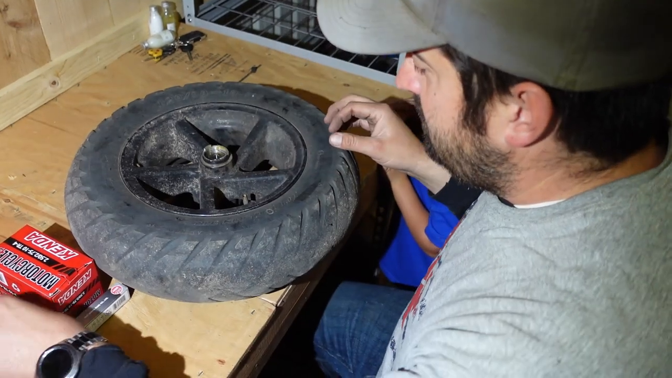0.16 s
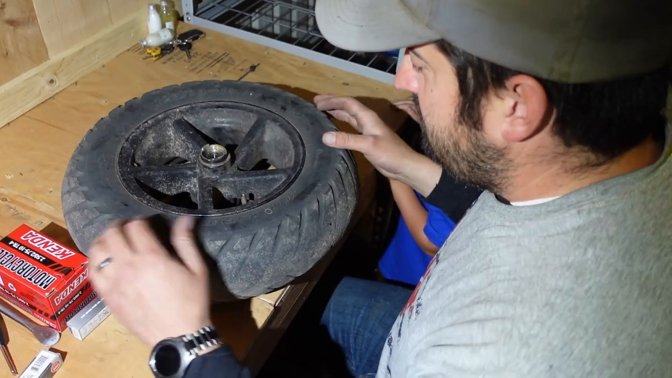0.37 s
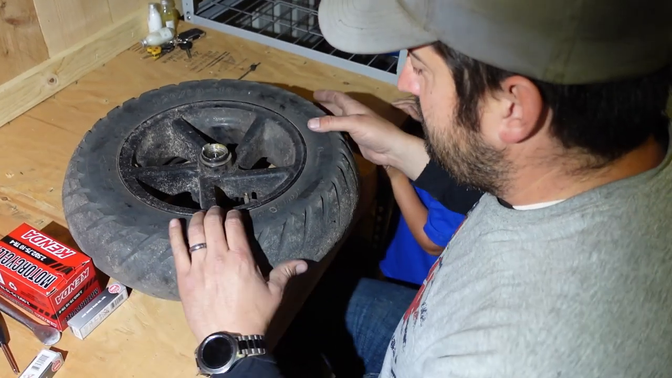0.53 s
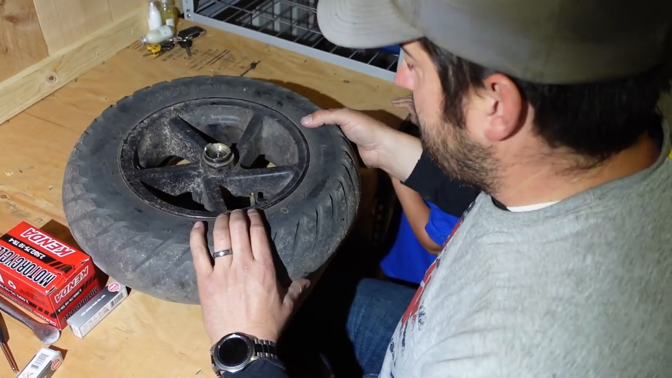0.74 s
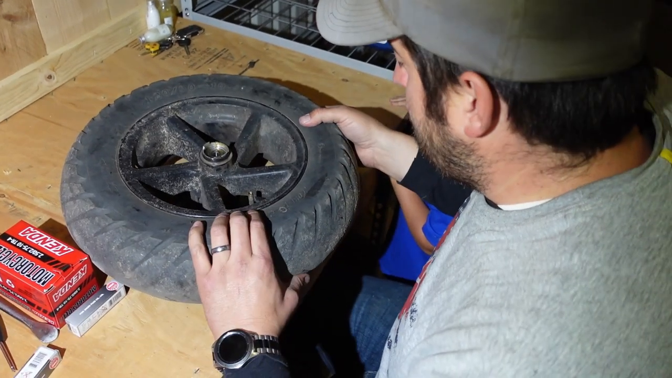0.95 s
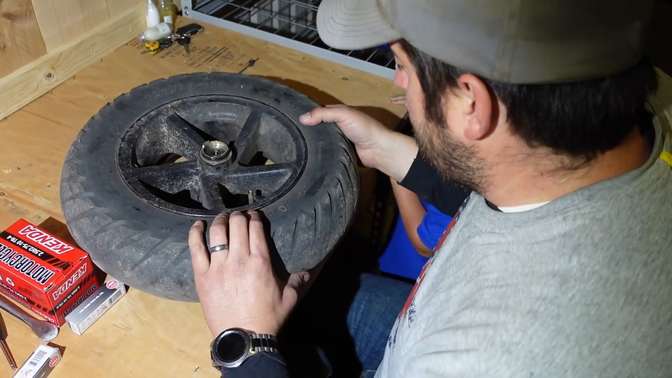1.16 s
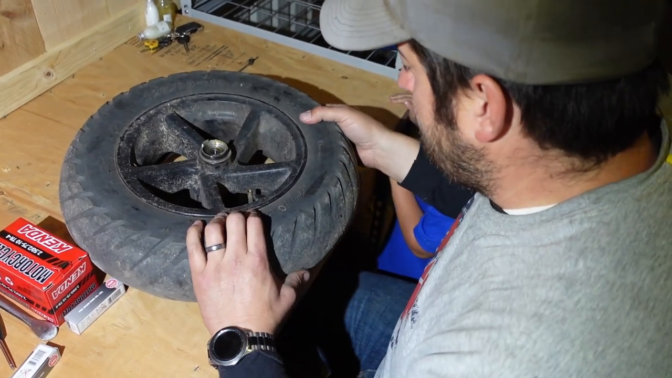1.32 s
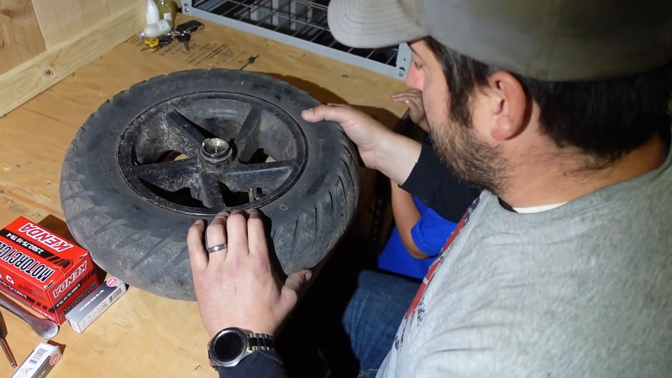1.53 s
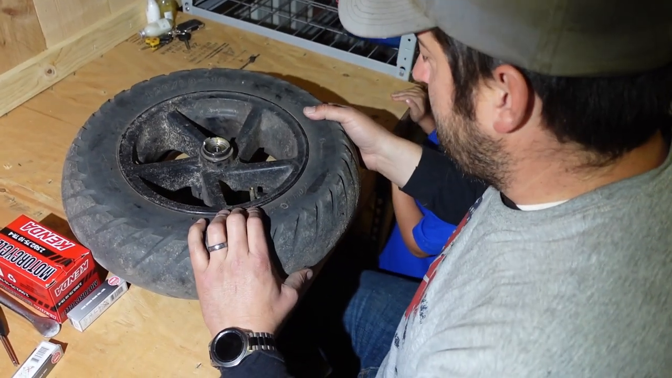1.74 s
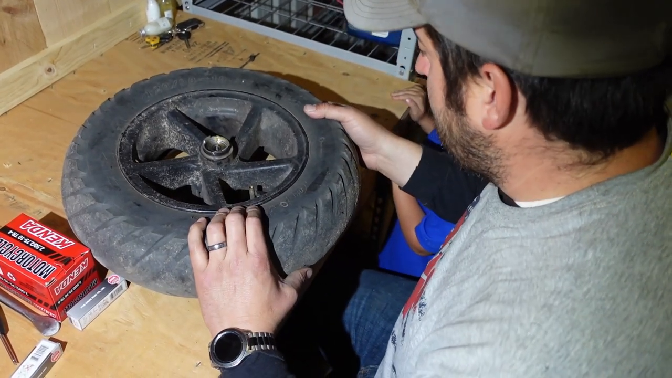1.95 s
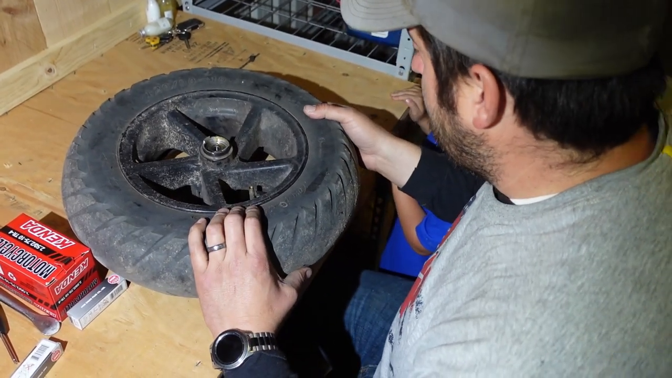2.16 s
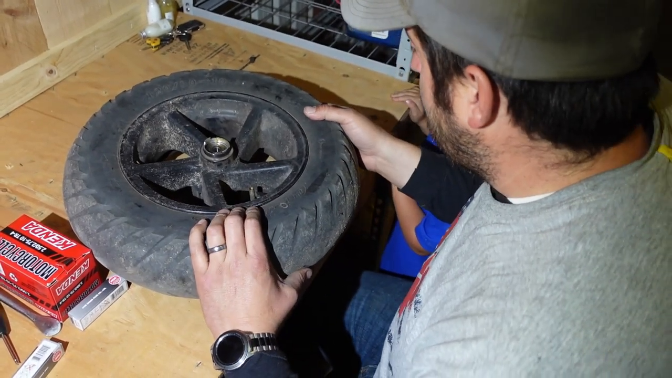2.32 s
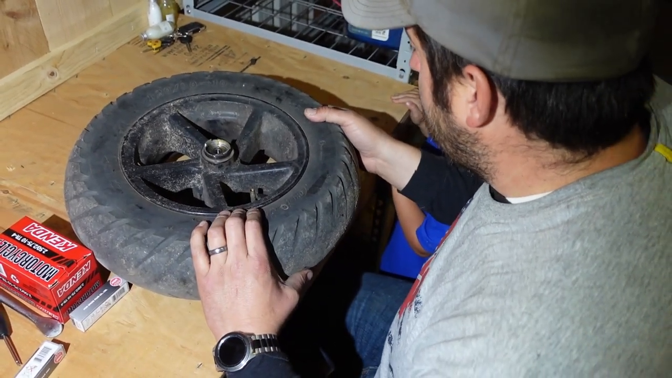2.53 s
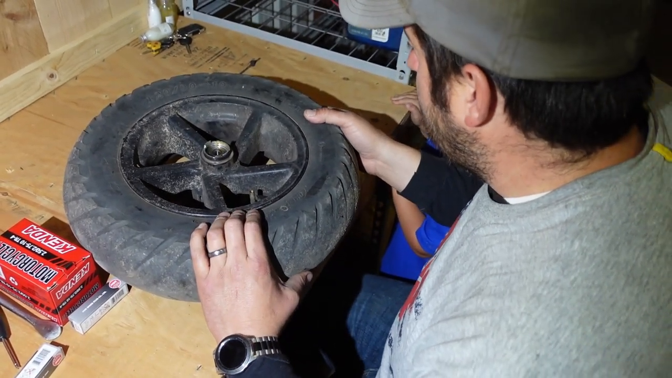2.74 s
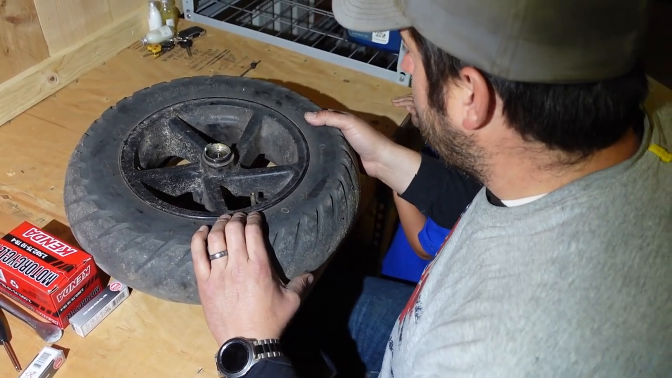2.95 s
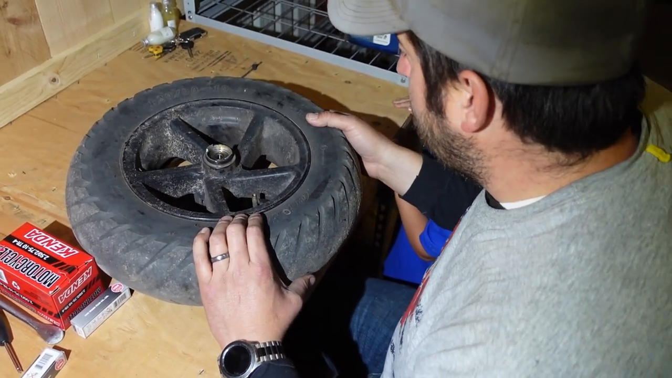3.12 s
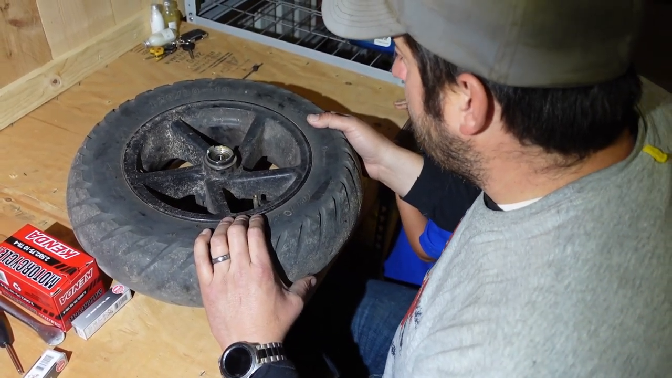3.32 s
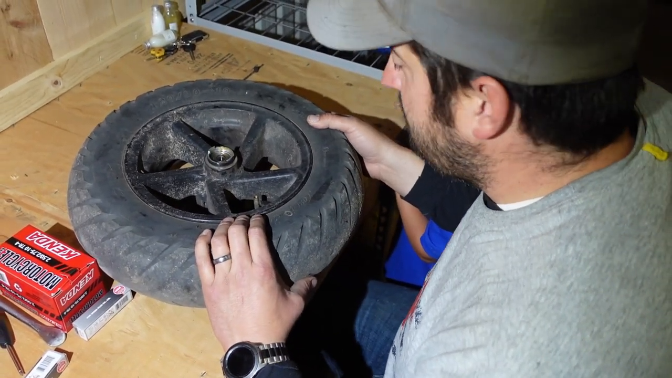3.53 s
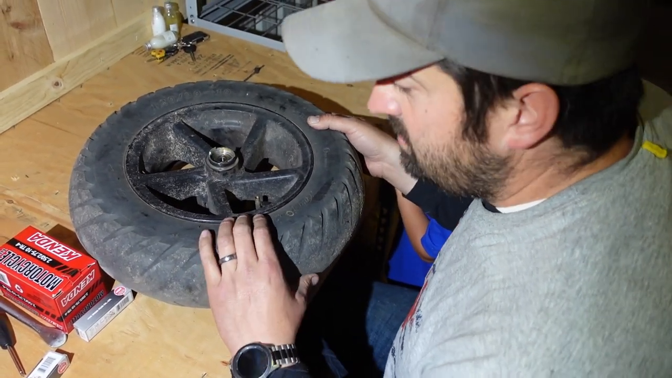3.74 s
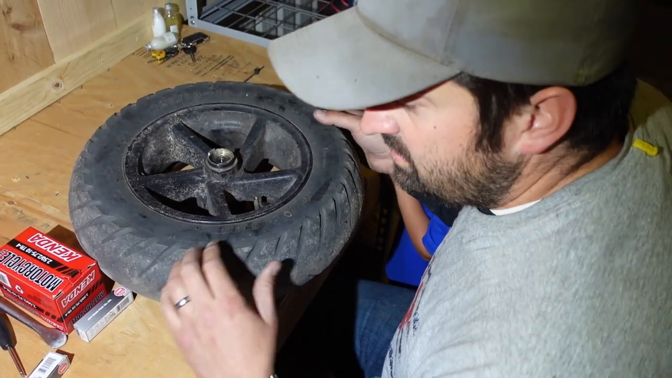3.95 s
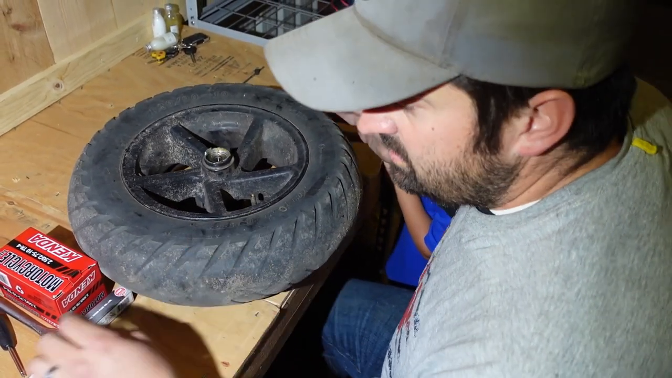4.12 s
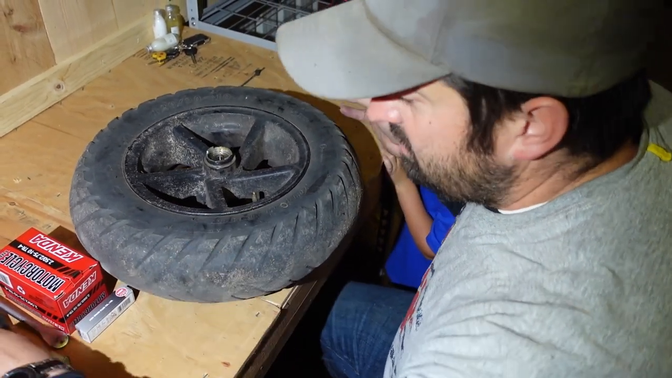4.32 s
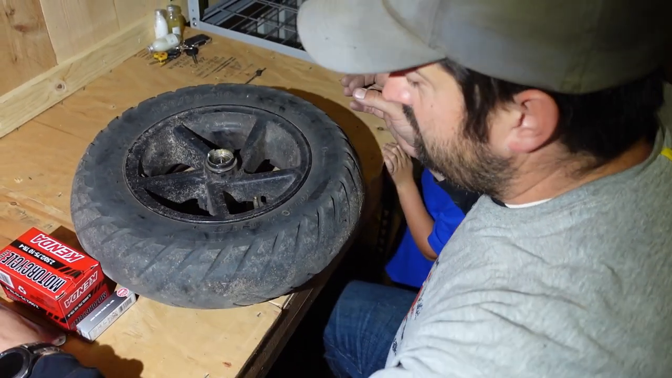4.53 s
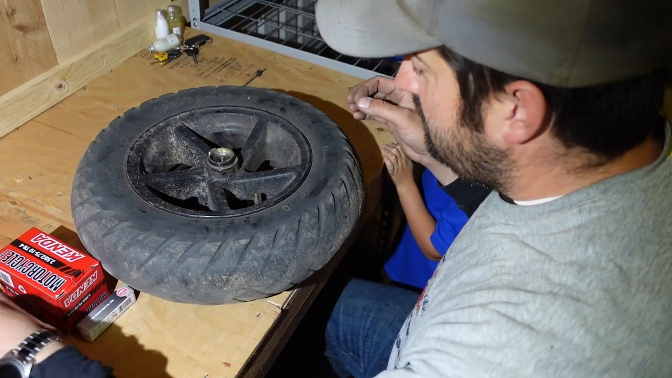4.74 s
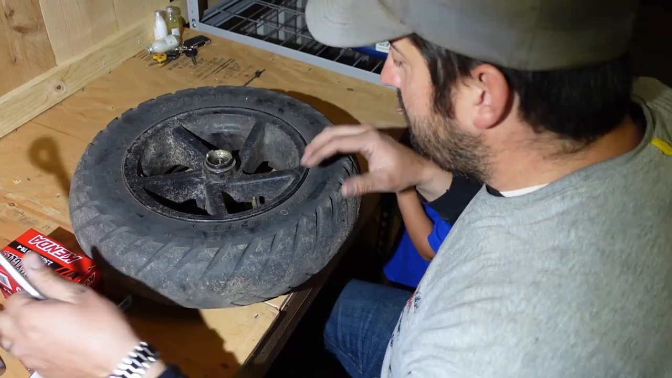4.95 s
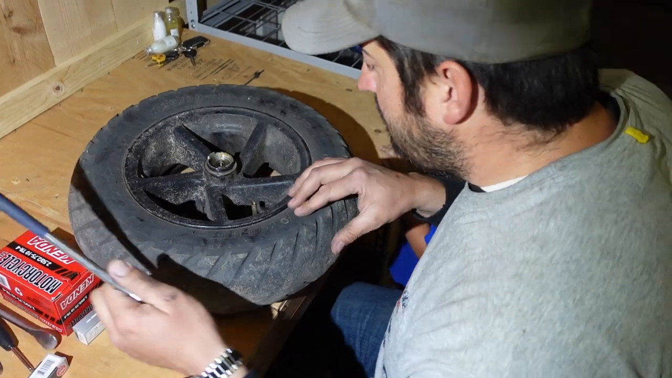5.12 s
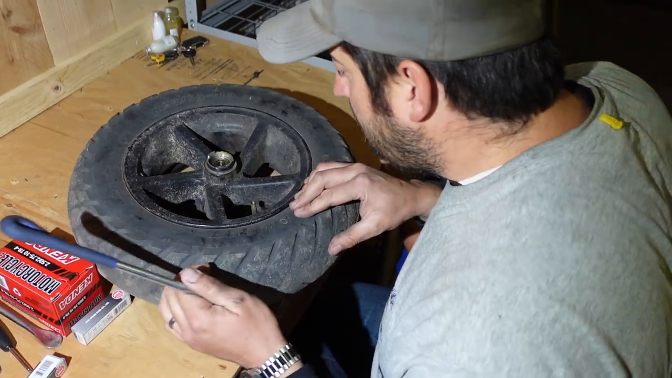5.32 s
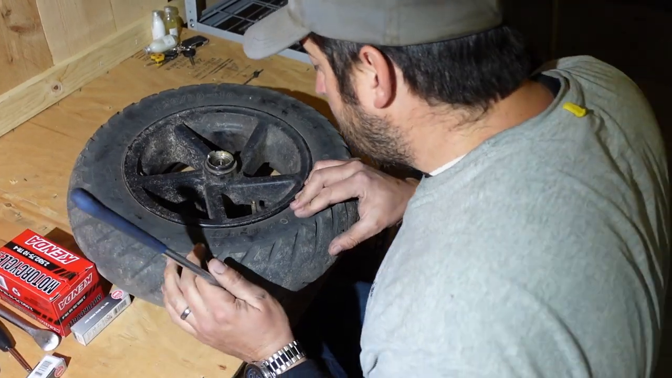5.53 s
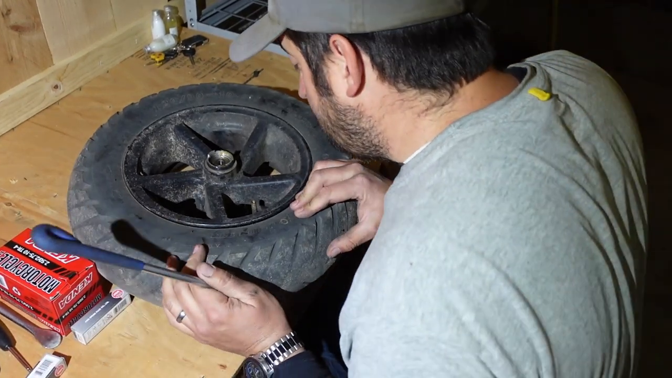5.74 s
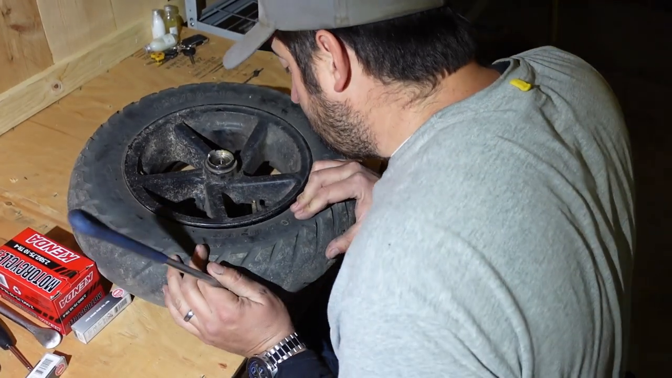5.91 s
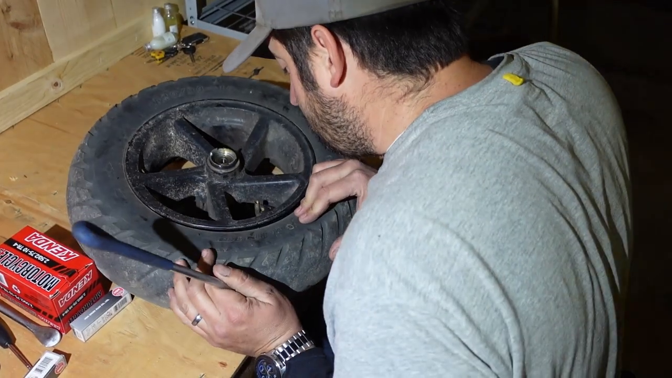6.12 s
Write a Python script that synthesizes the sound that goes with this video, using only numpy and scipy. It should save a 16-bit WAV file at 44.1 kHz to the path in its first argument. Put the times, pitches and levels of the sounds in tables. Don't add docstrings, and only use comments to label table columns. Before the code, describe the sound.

Pressurised air rushes loudly from a small tire's open valve with breathy whistles, fading away before thuds, pats and scrapes on a wooden bench.

```python
import sys
import numpy as np
from scipy import signal
from scipy.fft import rfft, irfft, next_fast_len
from scipy.io import wavfile
from scipy.ndimage import uniform_filter1d

SR = 44100
rng = np.random.default_rng(int(sys.argv[2]) if len(sys.argv) > 2 else 0)


def digitize_waveform(pressure):
    field = np.atleast_2d(pressure).T
    bounded = np.clip(field, -1, 1)
    quanta = np.round(bounded * 32767).astype(np.int16)
    wavfile.write(sys.argv[1], SR, quanta)


def invert_db(x):
    u = np.asarray(x, float) / 20
    return 10 ** u


N = 272229
HZ = np.fft.rfftfreq(1024, 1 / SR)
TIMES = np.arange(N // 128 + 9) * 128 / SR
SNAP_TOP_HZ = 15500


def evened(x):
    return x / np.sqrt(np.mean(x ** 2) + 1e-20)


def read(points, hz):
    f, value = np.transpose(points)
    return np.interp(np.log(hz + 1), np.log(f + 1), value)


def curves(rows, t):
    s, *columns = np.transpose(rows)
    return [np.interp(t, s, c) for c in columns]


def add(mix, s, sound):
    part = mix[round(s * SR):][:len(sound)]
    part += sound[:len(part)]


def bandpass(x, order, band_hz):
    return signal.sosfilt(signal.butter(order, band_hz, "bandpass", fs=SR, output="sos"), x)


def hump(hz, width_hz):
    shape = 1 / (1 + ((HZ - np.reshape(hz, (-1, 1))) / (width_hz * .5)) ** 2) ** 2
    return shape / shape.sum(1, keepdims=True)


def noise(power):
    a, b = rng.standard_normal((len(TIMES), len(HZ), 2)).T
    spectrum = (a + 1j * b) * np.sqrt(power).T
    return 1.41 * signal.istft(spectrum, nperseg=1024, noverlap=896)[1][:N]


def wander(seconds, hz_wide):
    field = rng.standard_normal((len(TIMES), len(HZ)))
    for _ in range(2):
        field = uniform_filter1d(field, max(round(seconds / TIMES[1]), 1), 0)
        field = uniform_filter1d(field, max(round(hz_wide / HZ[1]), 1), 1)
    return evened(field)


def flutter(seconds):
    size = max(round(seconds * SR), 1)
    once = uniform_filter1d(rng.standard_normal(N), size)
    return evened(uniform_filter1d(once, size))


# (frequency [Hz], density [dB per Hz])
BACKGROUND_COLOUR = [(12, -41), (20, -11.5), (260, -24.5), (691, -32), (2560, -31.5), (2860, -23.5), (4000, -41),
                     (4730, -41), (5920, -41), (8400, -37), (8990, -35.5), (9900, -32), (10400, -47), (15700, -42)]
# (time [s], level [dB])
DEEP_RUMBLE = [(0.0, -43), (1.0, -39), (4.1, -32.5), (4.65, -43), (4.95, -58), (5.14, -18), (5.29, -14),
               (5.4, -28), (6.17, -26)]


def shop():
    colour = invert_db(2 * read(BACKGROUND_COLOUR, HZ))
    tone = noise(np.ones((len(TIMES), 1)) * colour / colour.sum()) * invert_db(-52)
    deep = evened(bandpass(rng.standard_normal(N), 2, [14, 55]))
    deep_db, = curves(DEEP_RUMBLE, np.arange(N) / SR)
    return tone + deep * invert_db(deep_db - 13)


# (frequency [Hz], density [dB per Hz])
WOOD_COLOUR = [(35, -53), (60, 6), (316, 2.5), (1050, -11), (1170, -11.5), (1600, -17), (2280, -15.5),
               (3040, -34), (3870, -27), (12000, -52), (15600, -70), (22000, -120)]
# (time [s], level [dB], brightness [dB per octave above 500 Hz])
SLIDES = [
    [(0.0, -71, 2), (0.05, -45, 4.5), (0.136, -45.5, 14), (0.232, -32, -35), (0.45, -47.5, 13)],
    [(4.34, -72, 9), (4.46, -38, 4.5), (4.59, -31, -2.5), (4.74, -28, -3.5), (4.87, -35, -3.5),
     (5.034, -21, -10.5), (5.14, -35, -2.5), (5.27, -32.5, -1.5), (5.548, -43, -3.5), (5.75, -54.5, 3.5),
     (6.17, -56, 7)],
]


def slide(rows):
    db, bright_db = (c[:, None] for c in curves(rows, TIMES))
    moving = ((TIMES > rows[0][0]) & (TIMES < rows[-1][0]))[:, None]
    colour = invert_db(2 * read(WOOD_COLOUR, HZ))
    power = moving * colour / colour.sum() * invert_db(2 * (db + bright_db * np.log2(HZ / 500 + 1)))
    return noise(power) * invert_db(1.6 * flutter(.006))


# (time [s], peak [dB], favoured pitch [Hz], ring factor [1])
THUD_HITS = [(0.847, -47, 110, 1.2), (1.672, -31, 111, 0.39), (4.392, -31.5, 120, 0.16),
             (4.687, -13, 109, 0.13), (4.78, -13, 141.7, 0.17), (5.169, -10.5, 108.5, 0.88),
             (5.199, -13.5, 111, 0.77), (5.3, -24, 110, 0.29), (5.38, -50, 99, .6), (5.408, -32, 110, 0.32),
             (6.152, -28, 95, 1.1)]
# (time [s], peak [dB], favoured pitch [Hz], spread [octaves], ring factor [1])
KNOCK_HITS = [(0.229, -9.5, 870, 0.7, 0.39), (.274, -16, 910, 1.1, 0.45), (0.304, -6.5, 850, 1.16, 0.48),
              (0.314, -18, 770, 0.67, 0.95), (.346, -9.5, 785, 1.23, 0.31), (.74, -26.5, 70, 1.76, 0.1),
              (0.764, -32, 65, 1.3, 0.31), (.788, -30, 111, 1.3, 0.2), (1.674, -28, 390, 0.57, 0.32),
              (1.785, -29.5, 980, 0.31, 0.59), (3.753, -31.5, 850, 0.37, 0.2),
              (4.525, -21, 740, 0.24, 0.56), (4.542, -34, 316, 0.44, .55), (4.624, -19.5, 296, 0.28, 0.64),
              (4.637, -24, 323, 0.28, 0.58), (4.686, -11.5, 298, 0.89, 1.1), (4.705, -24, 200, 1.5, 0.7),
              (4.778, -11.5, 305, 0.63, 0.5), (4.8, -19, 247, 0.98, 0.77), (5.003, -14, 330, 0.45, 0.7),
              (5.026, -50, 1750, 0.11, 3.8), (5.164, -16.5, 232, 0.5, 0.77), (5.165, -28, 1330, 0.12, 0.48),
              (5.249, -12.5, 110, 0.61, 0.46)]
# (time [s], peak [dB], favoured pitch [Hz], spread [octaves], contact [s])
SCRAPE_HITS = [(.029, -28, 436, 0.41, 0.0042), (.064, -15.5, 880, 0.39, 0.0026), (.328, -44, 700, 1, 0.025),
               (.358, -21, 537, 1.3, 0.0081), (.698, -37, 110, 1, 0.014), (4.425, -31.5, 1150, 0.35, 0.051),
               (4.462, -15, 1070, 0.21, 0.011), (4.465, -21, 2100, 0.14, 0.014),
               (4.507, -21, 314, 0.14, 0.014), (4.578, -30.5, 900, 0.72, 0.015),
               (4.731, -21.5, 870, 0.19, 0.016), (4.926, -27.5, 586, 0.72, 0.036),
               (5.005, -16.5, 720, 0.3, 0.0069), (5.05, -25.5, 325, 0.2, 0.012),
               (5.2095, -14, 287.2, 0.58, 0.0053), (5.2476, -28.5, 2200, 0.4, 0.002),
               (5.249, -24.5, 880, 0.17, 0.017), (5.012, -27, 1770, 0.46, 0.0045),
               (5.27, -37, 1300, 0.82, 0.014)]


def blows():
    rows = []
    for s, db, hz, ring in THUD_HITS:
        rows.append((s, db, hz, 0.23, ring, 1 / hz))
    for s, db, hz, spread, ring in KNOCK_HITS:
        contact_cycles = np.clip(1.14 - 0.66 * spread, .2, 1.45)
        rows.append((s, db, hz, spread, ring, contact_cycles / hz))
    for s, db, hz, spread, contact_s in SCRAPE_HITS:
        ring = 0.59 + 0.1 * np.log2(hz / 500)
        rows.append((s, db, hz, spread, ring, contact_s))
    return sorted(rows)


# (frequency [Hz], t60 [s])
BENCH_MODES = [(70, .15), (116, .4), (162, .22), (219, .2), (305, .16), (350, .12), (404, .12), (520, .1),
               (600, .08), (685, .08), (780, .07), (880, .07), (1000, .05), (1170, .07), (1350, .04),
               (1550, .04), (1800, .06), (2030, .035), (2250, .04), (2450, .03)]


def knock(db, hz, spread, ring, contact_s, chance, grit):
    t = np.arange(len(grit)) / SR
    body = np.zeros(len(t))
    for (mode_hz, t60), (detune, share) in zip(BENCH_MODES, chance):
        weight_db = -6 * (np.log2(mode_hz / hz) / max(spread, .1)) ** 2 + 0.33 * share
        ring_s = t60 * max(ring, .1)
        alive = t[t < 1.2 * ring_s]
        swing = -np.cos(2 * np.pi * mode_hz * (1 + 0.01 * detune) * alive + 0.85 * share)
        body[:len(alive)] += invert_db(weight_db - 60 * alive / ring_s) * swing
    band_hz = np.clip(hz * 2. ** (np.array([-.9, .9]) * max(spread, .1)), 30, 9000)
    rattle = evened(bandpass(grit, 2, band_hz))
    rattle_s = ring * 0.095 * (500 / hz) ** 1.41
    body = body / abs(body).max() + 0.18 * rattle * invert_db(-60 * t / rattle_s)
    if contact_s * hz > 1.5:
        push = np.sin(np.pi * np.minimum(t / max(contact_s, 3e-4), 1)) * grit[::-1]
    else:
        push = np.sin(np.pi * np.minimum(t * 4 * hz, 1))
    body = signal.fftconvolve(body, push[:1600])
    dull = signal.butter(4, min(3 * band_hz[1], 9000), fs=SR, output="sos")
    body = signal.sosfilt(dull, body)
    body[:len(t)] *= 1 - np.exp(-t / max(contact_s * 0.5, 1e-4))
    return invert_db(db) * body / abs(body).max()


def tick(db, hz, t60, top_hz, grit):
    t = np.arange(len(grit)) / SR
    wide = bandpass(grit, 3, [1300, min(top_hz, 20000)])
    r = np.exp(-np.pi * .12 * hz / SR)
    ring = signal.lfilter([1, 0, -1], [1, -2 * r * np.cos(2 * np.pi * hz / SR), r * r], grit)
    sound = (evened(wide) + evened(ring)) * invert_db(-60 * t / max(t60, .004))
    return invert_db(db) * sound / abs(sound).max()


# (time [s], peak [dB], favoured pitch [Hz], t60 [s])
STEEL_TICKS = [(0.229, -8.5, 2200, 0.018), (4.372, -39.5, 2300, 0.24), (4.4548, -30, 2700, 0.02),
               (4.468, -27.5, 3850, 0.058), (4.5795, -38.5, 4500, 0.1), (4.697, -34, 2170, 0.027),
               (4.698, -36, 3800, 0.02), (4.785, -38, 1800, .05), (4.787, -40, 1900, .03),
               (4.801, -35.5, 3660, 0.022), (4.941, -57, 2900, .06), (4.989, -32, 6400, 0.018),
               (5.0080, -25, 6000, 0.021), (5.1973, -35.5, 3900, 0.03), (5.2392, -45, 3400, 0.033),
               (5.248, -37, 2290, 0.037), (5.909, -47, 2500, .04), (6.042, -39, 6740, .04)]
# (time [s], peak [dB], favoured pitch [Hz], t60 [s])
LIGHT_SNAPS = [
    (4.367, -30.5, 6570, 0.024),
    (5.083, -40, 14300, 0.034),
    (5.163, -37.5, 4300, 0.05),
    (5.325, -45, 4220, 0.12),
    (5.7186, -29, 5940, .02),
    (5.726, -38, 5500, .04),
    (5.742, -44, 5000, 0.031),
    (5.807, -41, 6000, .04),
]


def bench():
    out = np.zeros(N)
    rows = blows()
    grits = rng.standard_normal((len(rows), 16000))
    chances = rng.standard_normal((len(rows), len(BENCH_MODES), 2))
    for (s, *row), chance, grit in zip(rows, chances, grits):
        add(out, s, knock(*row, chance, grit))
    clicks = [(*row, 1.42 * row[2]) for row in STEEL_TICKS]
    clicks = sorted(clicks + [(*row, SNAP_TOP_HZ) for row in LIGHT_SNAPS])
    for (s, *row), grit in zip(clicks, rng.standard_normal((len(clicks), 6000))):
        add(out, s, tick(*row, grit))
    t = np.arange(round(.5 * SR)) / SR
    tail = rng.standard_normal(len(t)) * invert_db(-60 * t / 0.11) * (t > .004)
    return out + invert_db(-5) * signal.oaconvolve(out, tail / np.linalg.norm(tail))[:N]


# (time [s], peak [dB], pitch [Hz], t60 [s])
DRY_RAPS = [(.036, -34, 520, 0.032), (.083, -34, 950, 0.02), (.098, -37, 706, .03), (.113, -28, 890, .03),
            (.123, -38, 630, .03), (.136, -39, 750, 0.028), (.2295, -16.5, 730, 0.031),
            (0.23, -10.5, 2840, 0.021), (.237, -19, 870, .02), (.258, -25, 416, .04),
            (.2745, -17.5, 885, 0.025), (.289, -25, 800, 0.03), (.304, -12.5, 780, 0.027),
            (0.3043, -13, 1890, .02), (.316, -20, 810, 0.019), (.321, -26, 885, 0.028),
            (.326, -22, 1100, 0.013), (.3465, -21, 747, 0.049), (.347, -17, 1840, .02),
            (.358, -35, 640, 0.021), (.366, -23, 474, 0.02), (.375, -28, 450, 0.027), (.812, -40, 90, .12),
            (.832, -43, 110, .12), (.848, -44, 80, .12), (3.786, -49, 850, .04), (4.403, -45, 188, 0.057),
            (4.444, -39, 1160, .03), (4.469, -29, 2150, .04), (4.474, -16.5, 1160, 0.048),
            (4.475, -31, 3900, .04), (4.479, -24, 2340, .03), (4.526, -27, 1180, 0.027),
            (4.532, -34, 1150, .025), (4.545, -36, 800, 0.028), (4.656, -26, 326, 0.062),
            (4.688, -15.5, 750, 0.03), (4.6879, -16, 334, 0.086), (4.699, -51, 13300, .012),
            (4.73, -34, 1700, .02), (4.736, -24, 890, 0.037), (4.737, -31, 1540, 0.028),
            (4.746, -22, 880, .03), (4.759, -22, 423, 0.057), (4.778, -18, 648, 0.035),
            (4.788, -29, 980, 0.038), (5.007, -21.5, 830, 0.023), (5.221, -31, 870, 0.034),
            (5.25, -26.5, 1350, 0.033),
            (.064, -23, 1250, .015), (.222, -30, 800, .02), (.3065, -14.5, 860, 0.013),
              (.316, -23, 655, 0.026), (.35, -27, 660, .03), (4.455, -47, 11500, .015),
              (4.455, -44, 7000, .015), (4.706, -40, 2500, .015), (4.731, -44, 3300, .015),
              (4.802, -38, 2100, .02), (4.806, -45, 5500, .02), (4.991, -41, 3900, .025),
              (5.009, -34, 3800, .02), (5.0105, -31, 4900, .015), (0.773, -35, 100, .1),
              (.835, -38, 45, .15), (.865, -42, 110, .1), (0.944, -41, 110, .1), (.955, -43, 40, .15),
              (4.553, -32, 350, .05), (4.59, -38, 2500, .03), (4.99, -36, 5100, .015),
              (5.001, -24, 910, 0.017), (5.0075, -20, 400, 0.03), (5.015, -35, 4900, .012),
              (5.017, -16.5, 328, 0.067), (5.04, -41, 1800, .12), (5.055, -25, 250, 0.044),
              (5.1967, -37, 1900, .025), (5.1972, -39, 2800, .025), (5.199, -43, 5500, .02),
              (5.2206, -27, 590, .03), (5.2206, -36, 1500, .03), (5.222, -42, 2300, .02),
              (5.2405, -39, 2200, .02), (5.2473, -27, 2350, 0.017), (5.254, -43, 3600, .02),
              (5.256, -37, 1700, 0.023), (5.261, -26, 394, .04), (5.274, -40, 1490, .03),
              (5.282, -46, 2800, .03), (5.33, -48, 3000, .03)]
# (time [s], peak [dB], favoured pitch [Hz], t60 [s])
DRY_CRACKS = [(4.385, -48, 3000, .1), (4.456, -42, 8000, .03), (4.476, -40, 7000, .04),
              (4.53, -50, 7000, .04), (4.585, -47, 8000, .04), (4.698, -44, 7500, .03),
              (4.803, -45, 8000, .03), (5.198, -45, 8000, .03), (5.25, -45, 7000, .03),
              (5.274, -46, 4500, .03), (5.335, -46, 7000, .06)]


def raps():
    out, t = np.zeros(N), np.arange(5000) / SR
    rows = DRY_RAPS
    for (s, db, hz, t60), turn in zip(rows, rng.random(len(rows))):
        partner = invert_db(-15) * np.sin(2 * np.pi * (1.5 * hz * t + turn))
        pair = np.sin(2 * np.pi * hz * t) + partner
        rise = 1 - np.exp(-t * hz / 0.14)
        sound = pair * rise * invert_db(-60 * t / max(t60, .005))
        add(out, s, invert_db(db) * sound / abs(sound).max())
    for (s, *row), grit in zip(DRY_CRACKS, rng.standard_normal((len(DRY_CRACKS), 6000))):
        add(out, s, tick(*row, SNAP_TOP_HZ, grit))
    return out


# (frequency [Hz], width [Hz], lift [dB])
REFLECTIONS = [(470, 150, 4), (835, 120, 6), (1990, 200, 4), (2480, 100, 4), (2875, 130, 3), (4560, 70, 3),
               (4710, 70, 6), (4830, 60, 1.5), (5080, 60, 3), (5450, 200, 6), (6230, 95, 6), (6580, 55, 6),
               (6840, 45, 5), (7010, 52, 5), (7230, 55, 4), (8400, 70, -7), (7950, 70, 5), (8250, 80, 6),
               (8515, 55, 5), (8760, 50, 5), (9020, 60, 6), (9490, 50, 4), (10100, 200, 4), (11000, 80, 4),
               (11500, 170, 4), (12100, 120, -6), (3020, 70, -7), (5220, 90, -6), (8870, 70, -8),
               (15500, 300, 4), (3110, 50, 4), (3420, 90, 4), (13700, 300, 3), (14400, 300, 4),
               (12900, 400, -1), (4940, 70, -5), (4200, 90, -4), (3850, 250, -1), (2340, 80, -5),
               (3250, 120, -4), (2930, 50, -2), (2830, 60, 3)]


def wheel(x):
    total = next_fast_len(N + SR // 2)
    hz = np.fft.rfftfreq(total, 1 / SR)
    lift_db = sum(db / (1 + ((hz - f) / (width / 2)) ** 2) ** 2 for f, width, db in REFLECTIONS)
    size = round(40 / hz[1])
    draws = rng.standard_normal((len(hz), 2)).T
    a, b = (evened(uniform_filter1d(uniform_filter1d(v, size), size)) for v in draws)
    ripple = abs(1 + 0.22 * (a + 1j * b))
    return irfft(rfft(x, total) * invert_db(lift_db - 4) * ripple, total)[:N]


# (frequency [Hz], density [dB per Hz])
JET_COLOUR = [(150, -82), (250, -36), (458, -22), (695, -30.5), (841, -20), (1410, -26), (1860, -17.5),
              (2340, -19.5), (2550, -12.5), (4000, -18.5), (4750, -9.5), (5850, -15.5), (8560, -11.5),
              (10000, -20.5), (15700, -27.5)]
# (frequency [Hz], change [dB per dB of jet level])
JET_FOLLOW = [(300, 0.38), (1000, 0.8368), (3000, 0.8063), (8000, 1.3059), (15000, 1.5)]


def jet(jet_db, squeezed):
    colour = invert_db(2 * read(JET_COLOUR, HZ))
    colour = colour / colour[HZ > 10500].sum()
    level_db = -37.5 + read(JET_FOLLOW, HZ) * (jet_db + 38) + 0.27 * wander(0.023, 500)
    low_cut_db = -12.5 * squeezed / (1 + (HZ / 2500) ** 2)
    return colour * invert_db(2 * level_db) * invert_db(2 * low_cut_db)


# (pressure [dB], frequency [Hz])
LOW_CORE_PITCH = [(-56, 2890), (-42, 2895), (-38, 2830), (-33, 2900)]


def tube(pressure_db, main_hz, levels, squeezed):
    main_db, low_db, middle_db, upper_db, middle_hz, upper_hz = levels
    narrow = np.clip(1.1 + 0.022 * (pressure_db[:, None] + 33), .45, 1.1)
    overblown_db = np.maximum(pressure_db[:, None] + 20.5, 0)
    core = np.clip(0.52 + 0.13 * (1.1 - narrow) - 0.1 * overblown_db, 0, 1)
    main = core * hump(np.maximum(main_hz, 4690), 212 * narrow)
    main = main + (1 - core) * hump(main_hz, 800 * narrow)
    core_hz, = curves(LOW_CORE_PITCH, pressure_db)
    low = (1.3 - narrow) * 0.74 * hump(core_hz, 110) + .27 * hump(2880, 750 * narrow)
    middle = hump(middle_hz, 360 * narrow)
    upper = hump(upper_hz, 610 * np.where(squeezed, 1.3, narrow))
    return (invert_db(2 * (main_db + 4.5)) * main + invert_db(2 * (low_db + 1)) * low
            + invert_db(2 * (middle_db + 2.5)) * middle + invert_db(2 * (upper_db - 1)) * upper)


# (middle [s], half length [s], pitch [Hz], glide [Hz per s], level [dB])
PASSING_WHISTLES = [
    (0.35, 0.37, 6550, -500, -19.5),
    (0.52, 0.32, 12300, -2, -25.5),
    (.2, .3, 14600, 0, -30),
    (0.99, 0.49, 10950, 100, -32.5),
    (1.6, .7, 13700, 300, -47),
    (0.089, .15, 7800, 600, -19),
    (0.97, 0.23, 7000, 0, -25),
    (3.7, .5, 2360, 0, -56),
]
# (time [s], level [dB])
BEAD_SEEP = [(4.35, -75), (4.4, -55), (4.62, -58), (4.9, -62), (5.25, -64), (5.4, -49.5), (5.6, -54),
             (5.9, -50.5), (6.17, -66)]
# (frequency [Hz], width [Hz], level under the main whistle [dB])
OVERTONES = [(11430, 900, -13.5), (12400, 500, -18), (14100, 2100, -19), (14500, 300, -21)]


def side_whistles(main_db, squeezed):
    t = TIMES[:, None]
    power = invert_db(2 * (-15 - 24 * t)) * hump(9900, 800)
    for middle_s, half_s, hz, glide, db in PASSING_WHISTLES:
        heard = invert_db(2 * db) / (1 + ((t - middle_s) / half_s) ** 6)
        gliding_hz = hz + glide * np.clip(TIMES - middle_s, -half_s, half_s)
        power = power + heard * hump(gliding_hz, 0.028 * hz)
    seep_db, = curves(BEAD_SEEP, TIMES)
    power = power + invert_db(2 * seep_db[:, None]) * hump(2370, 600)
    overtones_db = np.minimum(main_db, -36) + 5 * squeezed
    return power + sum(invert_db(2 * (overtones_db + db)) * hump(hz, width) for hz, width, db in OVERTONES)


# (time [s], pressure [dB], main whistle [Hz])
TIRE_PRESSURE = [(0.0, -22, 4700), (0.33, -18.5, 4680), (0.66, -20, 4740), (0.99, -22, 4910),
                 (1.32, -27, 4760), (1.7, -32, 4610), (2.0, -35.5, 4770), (2.35, -38, 4810),
                 (2.8, -41.5, 4845), (3.3, -49, 4810), (3.8, -61, 4850), (4.29, -68, 4930),
                 (5.2, -94, 4920), (5.7, -84, 4900), (5.9, -66, 4920), (6.02, -62.5, 4920),
                 (6.17, -65.5, 4950)]
# (pressure [dB], jet [dB], main [dB], low [dB], middle [dB], upper [dB],
# middle pitch [Hz], upper pitch [Hz])
VALVE_RESPONSE = [(-85, -68.5, -66.5, -70, -95, -60.5, 8400, 9250),
                  (-68, -64, -60.5, -56.5, -77, -56, 5300, 9200),
                  (-56.5, -52.5, -43.5, -44, -67, -50.5, 8200, 9080),
                  (-48, -49, -40, -37.5, -55, -43, 7100, 9140),
                  (-38, -37.5, -26, -37, -37.5, -28.5, 7050, 8950),
                  (-33.5, -32.5, -23.5, -34.5, -36.5, -19.5, 7100, 8770),
                  (-24, -28.5, -20, -35, -27, -22, 6850, 8400),
                  (-19.5, -25, -21, -42, -24.5, -13.5, 6540, 8440),
                  (-19.5, -25, -27.5, -55, -48, -20, 6900, 8300)]


def air():
    pressure_db, main_hz = curves(TIRE_PRESSURE, TIMES)
    columns = curves(VALVE_RESPONSE, pressure_db)
    jet_db, main_db, low_db, middle_db, upper_db, middle_hz, upper_hz = (c[:, None] for c in columns)
    squeezed = TIMES[:, None] > 4.29
    jet_db, upper_db = jet_db + 5 * squeezed, upper_db + 2.5 * squeezed
    rush = jet(jet_db, squeezed)
    levels = main_db, low_db, middle_db, upper_db, middle_hz, upper_hz
    whistles = tube(pressure_db, main_hz, levels, squeezed) + side_whistles(main_db, squeezed)
    whistles = whistles * invert_db(2 * 1.08 * wander(0.02, 300))
    gusts = invert_db(0.37 * flutter(0.0029))
    return wheel(gusts * (noise(rush) + noise(whistles) * invert_db(0.58 * flutter(0.0076))))


def scene():
    return (air() + shop() + bench() + sum(slide(rows) for rows in SLIDES) + raps())[None]


def band_limit(x):
    return signal.sosfilt(signal.butter(12, 16750, fs=SR, output="sos"), x)


def record(dry):
    edge = signal.firwin(1023, 15720, window=("kaiser", 9), fs=SR)
    limited = signal.oaconvolve(np.clip(dry, -1, 1), edge[None], "same")
    return band_limit(limited)


dry = scene()
out = record(dry)
digitize_waveform(out)
```